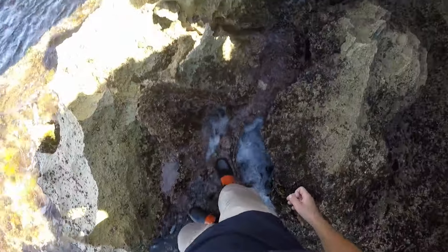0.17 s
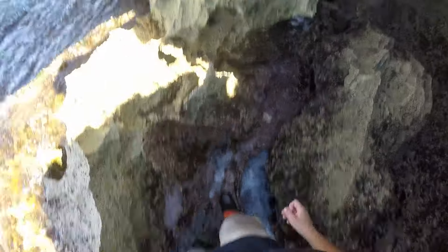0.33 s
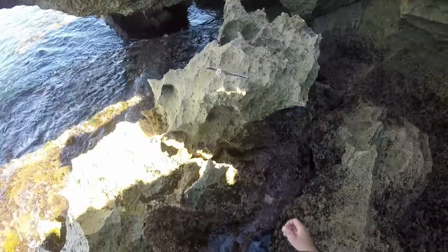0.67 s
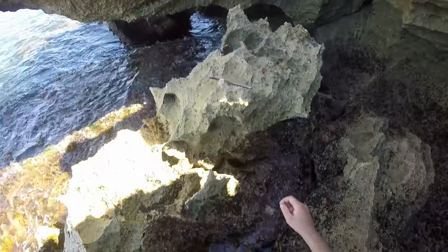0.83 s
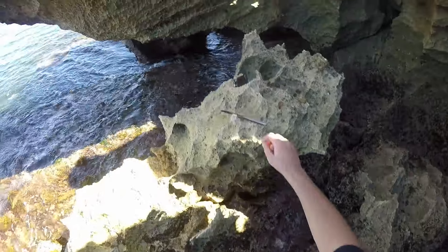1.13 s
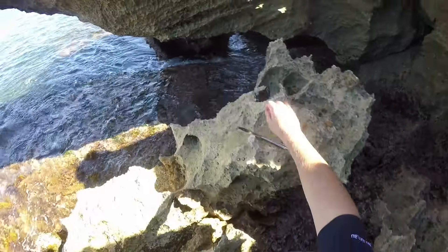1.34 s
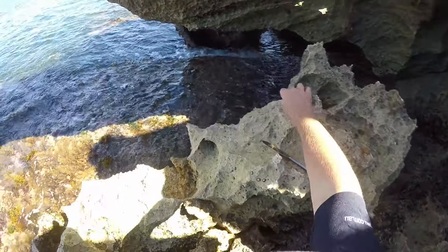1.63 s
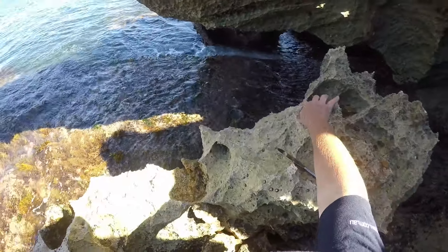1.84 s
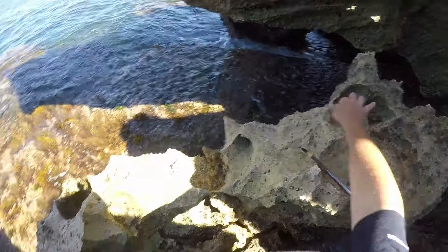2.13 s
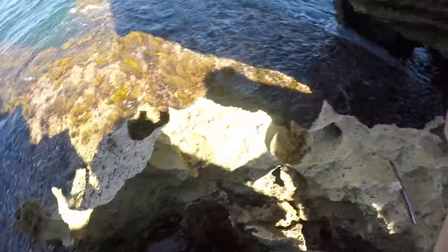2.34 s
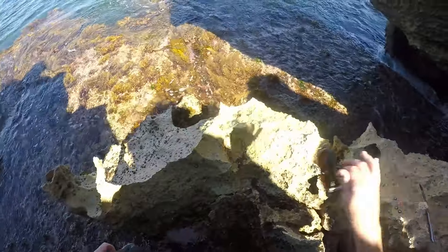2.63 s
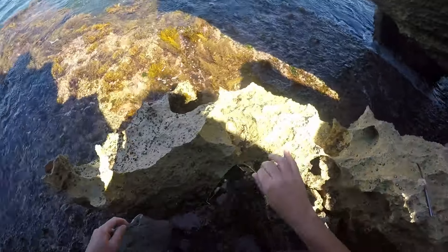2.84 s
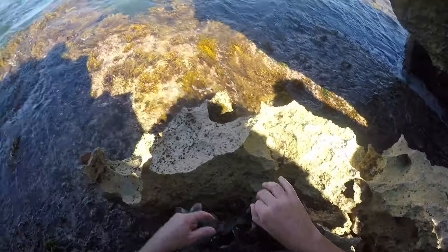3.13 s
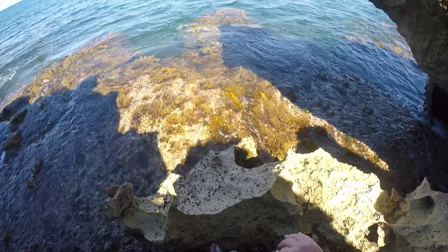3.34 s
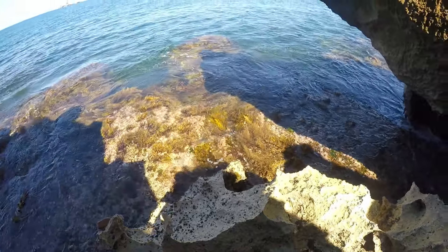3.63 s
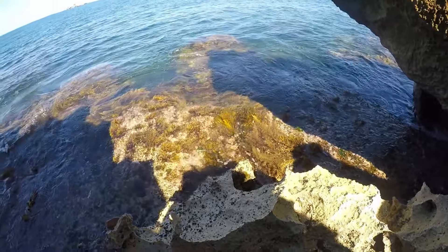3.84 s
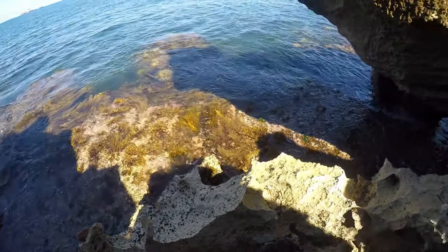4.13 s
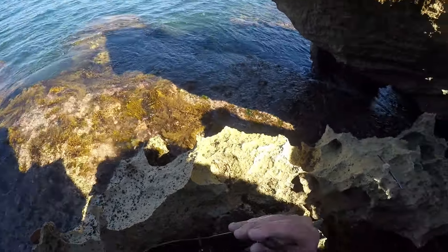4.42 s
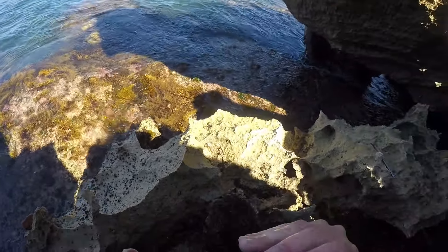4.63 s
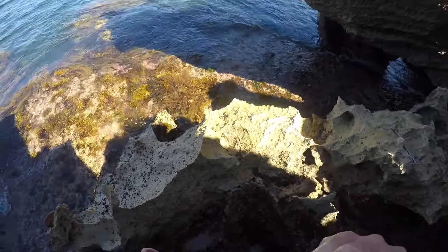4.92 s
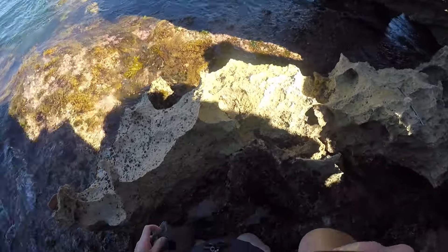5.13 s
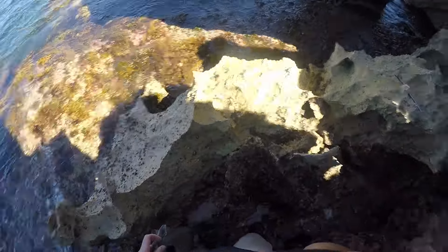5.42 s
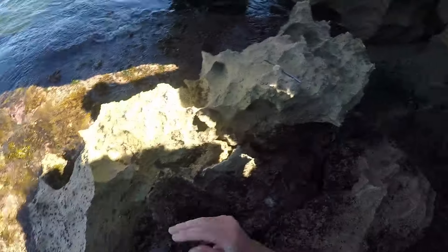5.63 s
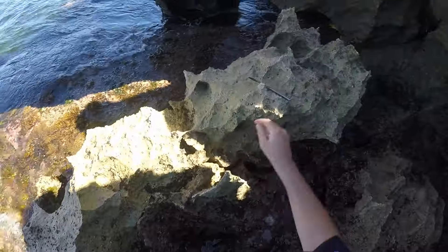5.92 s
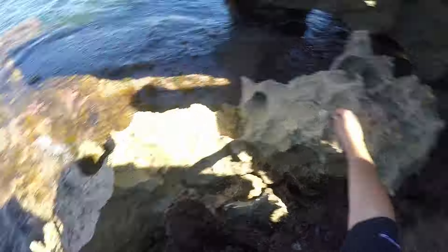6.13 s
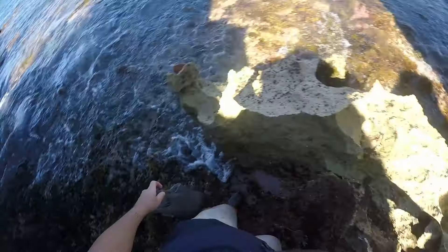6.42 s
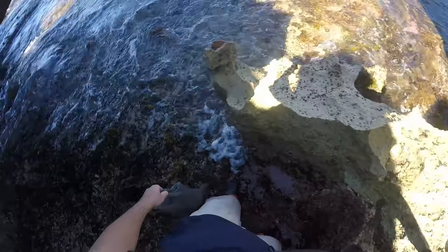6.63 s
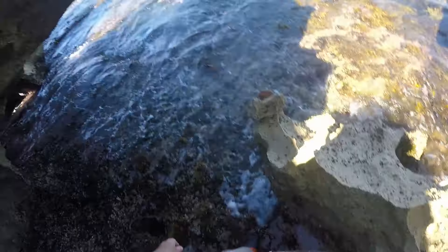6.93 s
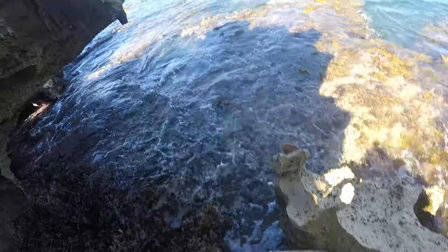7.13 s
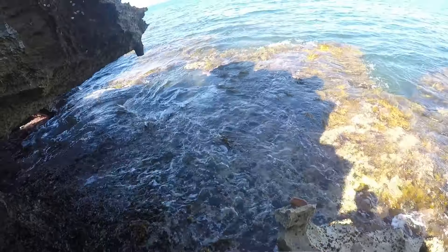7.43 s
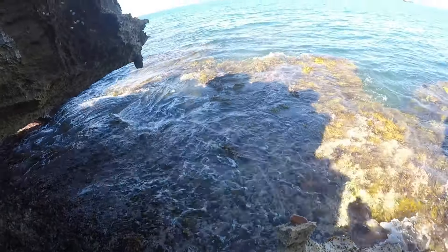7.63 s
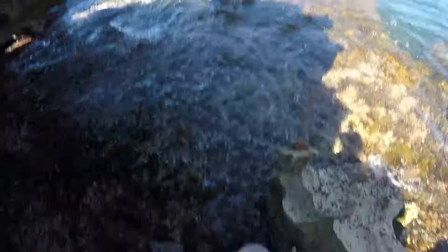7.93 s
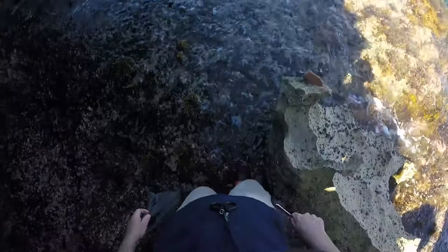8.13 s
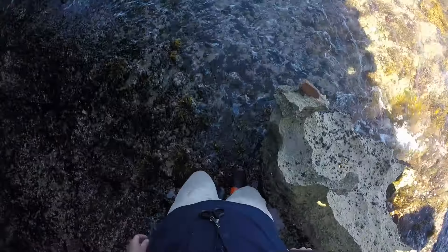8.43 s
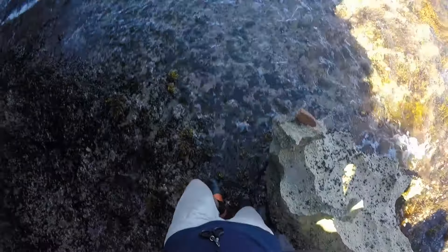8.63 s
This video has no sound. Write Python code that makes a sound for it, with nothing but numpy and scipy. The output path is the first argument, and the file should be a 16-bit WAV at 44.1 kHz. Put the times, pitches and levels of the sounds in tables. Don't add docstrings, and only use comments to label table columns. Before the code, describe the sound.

Seawater runs over reef rock close to a microphone sealed in a case worn on the head, so everything is boxy and dull with a narrow fizz on top. From 0 to 2.5 s the wash is fullest, in short foamy gushes with bubbly plinks; at about 0.67 s a sharp splash slap and a plastic click land with a low tug, and another deep thump follows at 0.9. Thuds and knocks return around 2.2-2.7. From 3 to 4.8 the water thins to a soft trickle with few bumps. At 4.9 a heavy low thump starts a scuffle of rumbling and creaky strap scrapes until about 5.6. Gushes resume, a wet splash comes near 6.4, bubbles plink around 6.8, a deep tug hits at 7.3, and knocks and livelier fizzing water fill 7.9-8.8. Faint low surf and a barely audible thin whine stay beneath.

```python
import sys
import numpy as np
from scipy import signal
from scipy.fft import rfft, irfft, next_fast_len
from scipy.io import wavfile
from scipy.ndimage import uniform_filter1d, map_coordinates

SR = 44100
rng = np.random.default_rng(int(sys.argv[2]) if len(sys.argv) > 2 else 0)


def natural_amplitude(level_db):
    exponent = np.asarray(level_db, float) / 20
    return 10 ** exponent


def unload_audio(sound):
    columns = np.transpose(np.atleast_2d(sound))
    steps = np.round(np.clip(columns, -1, 1) * 32767)
    wavfile.write(sys.argv[1], SR, steps.astype(np.int16))


N = 386757


def unit(x):
    return x / np.sqrt(np.mean(x ** 2) + 1e-20)


def place(out, start_s, grain):
    start = round(start_s * SR)
    out[start:start + len(grain)] += grain


def curves(rows):
    s, *cols = np.transpose(rows)
    return [np.interp(np.arange(N) / SR, s, c) for c in cols]


def wobble(rate):
    knots = rng.standard_normal(int(N * rate / SR) + 4)
    return map_coordinates(knots, [np.arange(N) * rate / SR])


def swells(rows, rest_db):
    t = np.arange(0, N + 99, 50) / SR
    power = natural_amplitude(2 * rest_db)
    for s, db, half in rows:
        late = t - s
        side = np.where(late < 0, 0.93 * half, half)
        power = power + natural_amplitude(2 * db) * np.exp(-(late / side) ** 2)
    return np.interp(np.arange(N) / SR, t, np.sqrt(power))


def filtered(x, response):
    m = next_fast_len(len(x) + SR // 4)
    return irfft(rfft(x, m) * response(np.fft.rfftfreq(m, 1 / SR)), m)[:len(x)]


def coloured(x, points):
    hz, db = np.transpose(points)
    return unit(filtered(x, lambda f: natural_amplitude(np.interp(np.log(f + 1), np.log(hz), db))))


def steady(x, span):
    power = uniform_filter1d(x ** 2, size=max(int(span * SR), 9))
    return unit(x / np.sqrt(np.abs(power) + 0.24))


def patchy(depth_db):
    z = signal.stft(rng.standard_normal(N + 512), nperseg=512)[2]
    field = uniform_filter1d(rng.standard_normal(z.shape), size=6, axis=0)
    field = uniform_filter1d(field, size=10, axis=1)
    return unit(signal.istft(z * natural_amplitude(depth_db * unit(field)), nperseg=512)[1][:N])


# frequency in Hz, rms level in dB.
WHINE = [(10406, -75)]


def whine():
    hz, db = WHINE[0]
    return natural_amplitude(db - 1.5) * np.sin(2 * np.pi * hz * np.arange(N) / SR + 1.5 * wobble(6))


# crest time in seconds, crest level in dB.
BREAKERS = [(0.0, -60), (0.8, -66.5), (1.56, -61.5), (2.42, -60), (3.1, -73), (4.1, -63), (4.75, -62.5),
            (5.25, -59), (5.76, -61.5), (6.3, -62.5), (7.18, -73), (7.96, -67), (8.35, -62)]
# frequency in Hz, density in dB per Hz.
SURF = [(76, -14), (130, -5.5), (156, -6.5), (215, -5), (397, -9), (800, -9.5), (1040, -12), (1760, -120)]


def far_surf():
    rest_db, half_length_s = -63.5, 0.27
    waves = swells([(s, db, half_length_s) for s, db in BREAKERS], rest_db)
    return waves * natural_amplitude(0.12 * wobble(15)) * coloured(patchy(2.5), SURF)


# peak time in seconds, peak level in dB, half length in seconds.
SWINGS = [(0.05, -35, 0.22), (0.38, -29, 0.061), (0.51, -28.5, 0.017), (0.68, -38, 0.15),
          (1.0, -26.5, 0.065), (1.29, -33.5, 0.058), (1.62, -29, 0.052), (1.89, -35, 0.049),
          (2.29, -26.5, 0.029), (2.46, -29, 0.085), (2.69, -31.5, 0.023), (3.15, -35, 0.039),
          (3.6, -36, 0.043), (3.83, -28.5, 0.025), (4.08, -35.5, 0.045), (4.57, -31, 0.044),
          (4.71, -28.5, 0.037), (4.81, -27, 0.024), (4.91, -29.5, 0.026), (5.26, -27, 0.11),
          (5.49, -28.5, 0.1), (5.73, -26, 0.058), (6.0, -30, 0.12), (6.62, -31, 0.12), (6.86, -24.5, 0.037),
          (7.01, -26.5, 0.062), (7.42, -27.5, 0.15), (7.65, -32, 0.019), (8.07, -24.5, 0.093),
          (8.48, -29, 0.044)]
# frequency in Hz, density in dB per Hz.
SWAY = [(4.7, -13.5), (8.0, -13.5), (30, -8.5), (40, -21.5), (49, -48), (60, -29), (78, -57), (130, -120)]
# peak time in seconds, peak level in dB, half length in seconds.
RUBS = [(0.42, -42.5, 0.064), (0.68, -59, 0.043), (0.88, -54, 0.038), (1.01, -43.5, 0.03),
        (1.29, -47, 0.066), (1.8, -47, 0.063), (2.0, -54, 0.073), (2.27, -57, .06), (2.48, -51, 0.073),
        (2.64, -37.5, 0.025), (3.13, -53, .06), (3.95, -54.5, 0.18), (4.55, -51.5, 0.28),
        (4.67, -47, 0.015), (4.785, -42, 0.037), (4.95, -36, 0.071), (5.1, -39, 0.097), (5.43, -44, 0.095),
        (5.69, -50.5, 0.032), (5.98, -70, .03), (6.26, -47, 0.17), (7.8, -51, 0.039), (6.62, -46.5, 0.048),
        (6.79, -43, 0.055), (6.98, -50.5, 0.055), (7.28, -48, 0.11), (7.55, -53, .04), (7.95, -43.5, 0.067),
        (8.36, -57, 0.024), (8.77, -50, 0.065)]
# frequency in Hz, density in dB per Hz.
RUMBLE = [(29, -43), (50, 6), (75, -6.5), (110, -9.5), (151, -23.5), (400, -43.5), (520, -49), (880, -120)]


def strap():
    sway_rest_db, rumble_rest_db = -39, -57
    sway = steady(coloured(rng.standard_normal(N), SWAY), span=0.102)
    lumps = natural_amplitude(3.7 * wobble(22)) * coloured(rng.standard_normal(N), RUMBLE)
    rumble = steady(unit(lumps), span=0.049)
    return natural_amplitude(-3.0) * swells(SWINGS, sway_rest_db) * sway + swells(RUBS, rumble_rest_db) * rumble


# start in seconds, peak level in dB.
BUMPS = [(.357, -56), (.473, -46), (.965, -46), (1.02, -41), (1.209, -50), (1.852, -55), (2.225, -50),
         (2.269, -45), (2.3, -50), (2.365, -45), (2.432, -38), (2.52, -48), (2.69, -48), (3.107, -59),
         (3.251, -53), (3.428, -46), (3.556, -52), (3.728, -43), (4.077, -47), (4.326, -49), (4.483, -43),
         (4.534, -43.5), (4.656, -40), (4.783, -43), (4.845, -40), (4.935, -37), (4.97, -36), (5.0, -44),
         (5.055, -40), (5.09, -33), (5.125, -40), (5.16, -41), (5.215, -42), (5.41, -49), (5.435, -34),
         (5.465, -48), (6.158, -51), (6.439, -45), (6.575, -47), (6.746, -55), (6.871, -53), (6.969, -50),
         (7.282, -47), (7.485, -52), (7.604, -56), (7.939, -50), (7.98, -39), (8.111, -57), (8.332, -59),
         (8.74, -54)]


def bumps():
    mount_hz, scatter_octaves, peak_s = 120.4, 0.21, 0.0086
    out, t = np.zeros(N + SR), np.arange(SR // 8) / SR
    age = t / peak_s
    for s, db in BUMPS:
        hz = mount_hz * 2 ** (scatter_octaves * rng.standard_normal())
        place(out, s, natural_amplitude(db + 2.0) * age * np.exp(-age ** 1.1) * np.sin(2 * np.pi * hz * t))
    return out[:N]


# centre in Hz, width in Hz, level in dB.
SHELL = [
    (990, 370, 3),
    (1700, 450, -7),
]


def shell(f):
    total = 0
    for k, (centre, width, db) in enumerate(SHELL):
        mode = 1j * f * width / (centre * centre - f * f + 1j * f * width)
        total = total + (-1) ** k * natural_amplitude(db) * mode
    return total


# start in seconds, peak level in dB, length in seconds, creak in Hz.
SLIPS = [(4.876, -45, 0.057, 930), (4.983, -42, 0.034, 1017), (5.035, -40.5, 0.038, 987),
         (5.04, -48, 0.035, 816), (5.062, -44, 0.025, 980), (5.08, -46, 0.03, 1090),
         (5.135, -40.5, 0.031, 950), (5.138, -42, 0.03, 1070), (5.165, -47, 0.029, 940),
         (5.171, -47, 0.03, 1095), (5.201, -44, 0.034, 1000), (5.223, -42, 0.046, 1108),
         (5.234, -48, 0.03, 910), (5.256, -47.5, 0.027, 955), (5.285, -50, 0.05, 1110),
         (5.408, -44, 0.03, 1043), (5.441, -43, 0.04, 1075), (5.471, -47, 0.06, 990),
         (5.556, -48, 0.046, 1005), (4.9, -51, 0.5, 1000)]


def slips():
    creak_db, creak_rise, creak_s = -3.5, 0.039, 0.054
    out, t = np.zeros(N + SR), np.arange(SR // 2) / SR
    for s, db, length, hz in SLIPS:
        age = t / length
        noise = rng.standard_normal(len(t))
        scrape = unit(filtered(noise, lambda f: shell(f) ** 2 / (1 + (f / 1500) ** 4)))
        creak = np.sin(2 * np.pi * hz * t * (1 + creak_rise * (age - 1)))
        creak *= natural_amplitude(creak_db) * np.exp(-(length / creak_s) ** 2 / 4)
        place(out, s, natural_amplitude(db + 6.5) * age * np.exp(-2.5 * age) * (0.67 * scrape + 1.3 * creak))
    return out[:N]


# start in seconds, peak level in dB, pitch in Hz, length in cycles, pitch sag from 0 to 1.
THUMPS = [(0.37, -34, 26.5, 2.4, 0.02), (0.635, -27.5, 29.8, 0.74, 0.1), (0.923, -21, 31.7, 3.4, 0),
          (1.28, -38, 25.6, 4.6, 0.41), (2.219, -25, 26.5, 5.7, 0.9), (2.274, -35, 26.6, 5.7, 0.2),
          (2.621, -28.5, 82.5, 1.5, 0.03), (2.685, -38, 70, 2.6, 0.2), (6.02, -44, 55, 2.2, 0.4),
          (2.752, -29, 27.2, 2.8, 0.5), (4.783, -29, 36, 1.7, 0.15), (4.893, -19.5, 50.3, 2.4, 0.29),
          (4.895, -25.5, 76.5, 1.5, 0.3), (5.037, -32.5, 45.4, 5.4, 0.28), (5.199, -28, 26.6, 4.6, 0.41),
          (5.487, -29.5, 45.8, 1.6, 0.03), (7.288, -27.5, 54, 1.64, 0), (7.94, -32, 48, 1.1, 0.36),
          (8.025, -27, 28.3, 3.1, 0.4), (8.345, -33.5, 44, 2, 0.35), (7.829, -35, 45, 2, 0.3),
          (8.03, -31, 44, 1.1, 0.3), (8.11, -40, 42, 3.3, 0), (1.379, -36, 40.3, 4.2, 0)]
PULLS = [
    (0.672, -21.5, 38.3, 2.44, 0.05),
    (0.999, -25.5, 33, 2, 0.1),
    (6.595, -27, 26.6, 4.2, 0.05),
    (7.314, -21.5, 26.7, 1.97, 0.1),
]


def thumps():
    out, t = np.zeros(N + SR), np.arange(SR // 3) / SR
    onset = 1 - np.exp(-(t / 0.0042) ** 2)
    for way, rows in [(1, THUMPS), (-1, PULLS)]:
        for s, db, hz, cycles, sag in rows:
            age = t * hz / cycles
            turns = hz * t / (1 + sag * age)
            envelope = onset * np.sqrt(age) * np.exp(-2.5 * age ** 2)
            place(out, s, way * natural_amplitude(db + 9.0) * envelope * np.sin(2 * np.pi * turns))
    return out[:N]


# start in seconds, peak level in dB, pitch in Hz, wall level in dB, 60 dB decay in seconds.
KNOCKS = [(0.43, -47, 202, -39, 0.052), (1.022, -38.5, 215, -38.5, 0.035), (2.27, -36, 190, -52, 0.049),
          (2.361, -47.5, 203, -60, 0.072), (2.616, -56, 196, -62, 0.045), (3.563, -40.5, 226, -61, 0.04),
          (4.056, -59, 205, -51, 0.033), (4.331, -49, 197, -59, 0.082), (4.89, -39, 184, -54, 0.08),
          (5.138, -55, 229, -51, 0.041), (5.422, -58, 288, -47, 0.045), (5.454, -48, 227, -43, 0.045),
          (6.13, -46, 186, -41, 0.054), (6.162, -45, 225, -51, 0.048), (6.26, -54, 206, -48, 0.041),
          (7.288, -54, 188, -46, 0.059), (7.302, -69, 186, -44, 0.045), (7.607, -45, 190, -45, 0.045),
          (7.834, -46.5, 199, -44, 0.073), (7.981, -34.5, 211, -47, 0.035)]


def knocks():
    out, taps = np.zeros(N + SR), np.zeros(N)
    t, contact = np.arange(SR // 3) / SR, np.arange(900) / SR
    onset = 1 - np.exp(-(t / 0.0044) ** 2)
    for s, db, hz, shell_db, t60 in KNOCKS:
        place(out, s, natural_amplitude(db + 2.0 - 60 * t / t60) * onset * np.sin(2 * np.pi * hz * t))
        scrape = np.exp(-contact / 0.0002) + 0.11 * np.exp(-contact / 0.01) * rng.standard_normal(900)
        place(taps, s + 0.003, natural_amplitude(shell_db + 16.5) * scrape)
    return out[:N] + filtered(taps, lambda f: shell(f) / (1 + 1j * f / 3300) ** 2 * 1j * f / (450 + 1j * f))


# pitch in Hz, level in dB, 60 dB decay in seconds.
SNAP = [(2340, 5, 0.011), (4230, 6.5, 0.011), (3300, -8, 0.007), (5400, -7, 0.008), (6900, -11, 0.009),
        (10700, -27, .012), (13500, -30, .012)]
# start in seconds, level in dB.
SNAP_AT = (.6712, -31.5)


def snap():
    start_s, level_db = SNAP_AT
    t = np.maximum(np.arange(N) / SR - start_s, 0)
    onset = 1 - np.exp(-(t / 0.0008) ** 2)
    ring = sum(natural_amplitude(db - 60 * t / t60) * np.sin(2 * np.pi * hz * t) for hz, db, t60 in SNAP)
    return natural_amplitude(level_db - 0.5) * onset * ring


# start in seconds, peak level in
# dB, pitch in Hz, length in cycles.
DRIPS = [(.43, -35, 1040, 5), (1.02, -36, 1020, 7.6), (1.021, -42, 1700, 7), (7.115, -47, 370, 8.3),
         (4.369, -51, 350, 15), (4.39, -48, 800, 24), (1.02, -49, 300, 5), (2.274, -43.5, 367, 11),
         (2.29, -44, 484, 8), (2.45, -45, 800, 20), (2.445, -42, 1170, 25.4), (7.98, -42, 276, 5.9),
         (.68, -43, 6100, 18), (.9, -41, 1750, 14), (2.53, -37, 1880, 17), (5.1, -50, 2520, 70),
         (5.63, -43, 1740, 16), (6.409, -35.5, 1700, 12), (6.45, -41, 1820, 29), (6.77, -34, 2380, 11),
         (6.961, -41, 2400, 25), (7.326, -39, 4550, 23), (7.801, -46, 2600, 17), (.429, -33, 1730, 12),
         (1.285, -35, 1710, 14), (1.723, -38, 1670, 14), (6.806, -40, 2550, 11), (6.85, -45, 1380, 18),
         (6.87, -44, 1150, 17), (7.125, -45, 3850, 40), (7.284, -36, 1800, 14), (7.302, -44, 1550, 17),
         (7.982, -46, 1640, 12), (8.029, -42, 1840, 14), (8.21, -39, 3900, 30), (8.4, -40, 3920, 25),
         (8.545, -34, 3950, 25)]


def drips():
    out, t = np.zeros(N + SR), np.arange(SR // 10) / SR
    for s, db, hz, cycles in DRIPS:
        age = t * hz / cycles
        tone = np.sin(2 * np.pi * hz * t * (1 + 0.016 * age))
        place(out, s, natural_amplitude(db + 9.0) * age * np.exp(-3 * age) * tone)
    return out[:N]


# start in seconds, peak level in dB, length in seconds, brightness in dB per octave.
SPLASHES = [(0.067, -34, 0.025, -3), (0.667, -21, 0.035, 0), (0.854, -50, 0.025, -4), (1.37, -38, 0.022, 0),
            (2.175, -41, 0.025, -7), (2.2613, -45, 0.025, 0), (4.141, -42, 0.025, 10),
            (4.25, -38, 0.025, 0), (5.156, -44, 0.025, 12), (5.345, -38, 0.041, 3), (5.487, -44, 0.023, 2),
            (6.342, -39, 0.025, 2), (6.425, -31, 0.066, -2), (6.514, -36, 0.025, -2),
            (6.6644, -43, 0.033, 4), (7.32, -39, 0.029, 4), (7.9119, -54, 0.025, -3), (8.54, -41, 0.025, 0)]
# frequency in Hz, density in dB per Hz.
SPRAY = [(900, -64), (2250, -9), (3100, -21), (4200, -8), (5300, -18), (7000, -20), (15000, -40.5)]


def splashes():
    out, t = np.zeros(N + SR), np.arange(SR // 5) / SR
    ragged = natural_amplitude(0.79 * wobble(200))
    onset = 1 - np.exp(-t / 0.0019)
    for s, db, length, tilt_db in SPLASHES:
        hold = 0.2 * natural_amplitude(-60 * t / 0.04) + np.exp(-(t / length) ** 3)
        spray = rng.standard_normal(len(t)) * onset * hold
        colour = [(hz, level + tilt_db * np.log2(hz / 4000)) for hz, level in SPRAY]
        place(out, s, natural_amplitude(db - 31.5) * coloured(spray, colour))
    return out[:N] * ragged


def bubbles(count, centre_hz, octaves, cycles, scatter_db, size):
    draw, t = rng.random((count, 3)), np.arange(size) / SR
    hz = np.clip(centre_hz * 2 ** (octaves * (2 * draw[:, 1:2] - 1)), 300, 9000)
    age = t * hz / cycles
    gain = natural_amplitude(-scatter_db * np.log(draw[:, 2:] + 0.072)) * hz / centre_hz
    grain = gain * age * np.exp(-4 * age) * np.sin(2 * np.pi * hz * t * (1 + 0.087 * age))
    at = (draw[:, :1] * N).astype(int) + np.arange(size)
    return unit(np.bincount(at.ravel(), grain.ravel(), minlength=N)[:N])


# centre in Hz, width in Hz, peak or dip in dB.
PORT = [
    (1297, 43, -17),
    (1740, 144, 3),
    (2590, 210, 4),
    (3124, 270, -5),
    (3775, 100, 2),
    (4457, 294, -6.5),
    (4747, 92, 5.5),
    (6200, 220, 2),
]


def port(f):
    return natural_amplitude(sum(db / (1 + (2 * (f - centre) / width) ** 2) for centre, width, db in PORT))


# time in seconds, flow level in dB, foam over the flow in dB.
SEA = [(0.0, -51, -0.5), (0.56, -48, -3), (1.29, -47.5, -2.5), (1.6, -49.5, -2.5), (2.42, -50, -3),
       (2.9, -52.5, -3), (3.83, -54.5, -4), (4.8, -55, -5), (5.23, -56.5, -1), (5.54, -52.5, -4),
       (5.76, -53.5, -1), (6.06, -53.5, -4), (6.67, -55, -1.5), (7.18, -52.5, -3), (7.62, -53.5, -3.5),
       (7.96, -50.5, -3.5), (8.21, -50, 0), (8.77, -50, -1.3)]
# peak in seconds, wash in dB and foam in dB over the flow, half length in seconds.
GUSHES = [(.03, -6, -4, .02), (.075, -14, -4, .02), (0.12, -11, -3, .02), (0.254, -11, -4, .025),
          (.335, -7, -5, .02), (0.442, 0, -2, 0.022), (0.578, -13, -17, 0.026), (0.912, -4, -11, .025),
          (1.14, -7, -11, .02), (1.295, -4, -7, 0.02), (1.59, -4, -11, .025), (1.726, -3, 0, 0.022),
          (1.817, -15, -5, .02), (1.89, -8, -9, 0.015), (2.0, -13, -4, .02), (2.18, -14, -10, .025),
          (2.285, -9, -6, .02), (2.41, -7, -3, .02), (2.47, -6, -10, .03), (2.53, -3, -3, .03),
          (5.36, -7, 1, 0.032), (5.438, -5, -2, 0.036), (5.637, -3, -9, .02), (5.723, -2, -6, 0.018),
          (5.84, -5, -3, 0.036), (5.974, -1, -6, 0.024), (7.292, -4, -5, 0.034), (7.95, -15, -9, 0.022),
          (8.045, -4, 1, 0.033), (8.094, -6, -3, .02), (8.153, -9, -2, .02), (8.225, -17, -3, 0.049),
          (8.303, -2, -7, .02), (8.41, -3, -3, 0.029), (8.502, -7, -3, .02), (8.536, -13, 0, .02),
          (8.613, -8, -3, .02), (8.683, -6, -2, .02)]
# frequency in Hz, density in dB per Hz.
WASH = [(350, -10.5), (600, -8), (720, -6), (1180, -1.5), (1300, 3.5), (1430, -0.5), (1750, -1), (2020, -1),
        (2500, -2.5), (2880, -10), (3200, -8.5), (4160, -56), (7040, -120)]
FIZZ = [(1760, -61), (3000, -13), (3450, -4), (3740, 0), (3890, -0.5), (4470, 1), (4830, -6), (5220, -11),
        (6150, -9.5), (6600, -11.5), (8000, -19), (10400, -28.5), (17600, -120)]
TOP = [(4410, -13.5), (7500, -3), (9460, -6.5), (10600, -1.5), (11500, -6.5), (14400, -8.5), (15100, -10.5)]


def sea():
    spray_calm_db, spray_growth, calm_flow_db = -67.5, 0.57, -54.5
    flow_db, foam_db = curves(SEA)
    surge = 0.3 * wobble(14) + 0.6 * wobble(30)
    pops = bubbles(count=5000, centre_hz=2400, octaves=1.7, cycles=25.2, scatter_db=4.0, size=640)
    crackle = bubbles(count=2500, centre_hz=5640, octaves=0.93, cycles=1.2, scatter_db=1.5, size=80)
    water = patchy(0.75) + natural_amplitude(-13.5) * pops + natural_amplitude(-13.5) * crackle
    mist = patchy(1.0) + natural_amplitude(-15.0) * crackle
    wash_gush = swells([(s, wash, half) for s, wash, foam, half in GUSHES], 0)
    foam_gush = swells([(s, foam, half) for s, wash, foam, half in GUSHES], 0)
    wash = wash_gush * natural_amplitude(flow_db - 0.5 + 0.5 * surge) * coloured(water, WASH)
    fizz = foam_gush * natural_amplitude(flow_db - 0.5 + foam_db + 0.65 * surge) * coloured(water, FIZZ)
    spray_db = spray_calm_db + spray_growth * (flow_db - calm_flow_db)
    spray_gain = foam_gush ** 0.38 * natural_amplitude(spray_db + 0.77 * surge + 0.5 * wobble(25))
    return filtered(wash + fizz + spray_gain * coloured(mist, TOP), port)


def scene():
    movement = strap() + bumps() + slips() + thumps() + knocks() + snap()
    return (far_surf() + movement + drips() + splashes() + sea())[None]


def spliced(x):
    joins_hz, first_s, half_fade_s = 14.0195, 0.0585, 0.0062
    power_loss, whole_below_hz = 0.3, 350
    late_s = (((np.arange(N) / SR - first_s) * joins_hz + 0.5) % 1 - 0.5) / joins_hz
    dip = np.maximum(1 - (late_s / half_fade_s) ** 2, 0)
    loss = 1 - np.sqrt(1 - power_loss * dip)
    return x - loss * filtered(x, lambda f: 1 / (1 + (whole_below_hz / (f + 1)) ** 4))


def band_limit(x):
    return signal.sosfilt(signal.butter(12, 15280, fs=SR, output="sos"), x)


def record(dry):
    top_hz = 15290
    mix = filtered(spliced(dry[0] + whine()), lambda f: f < top_hz)
    return band_limit(mix[None])


dry = scene()
out = record(dry)
unload_audio(out)
```